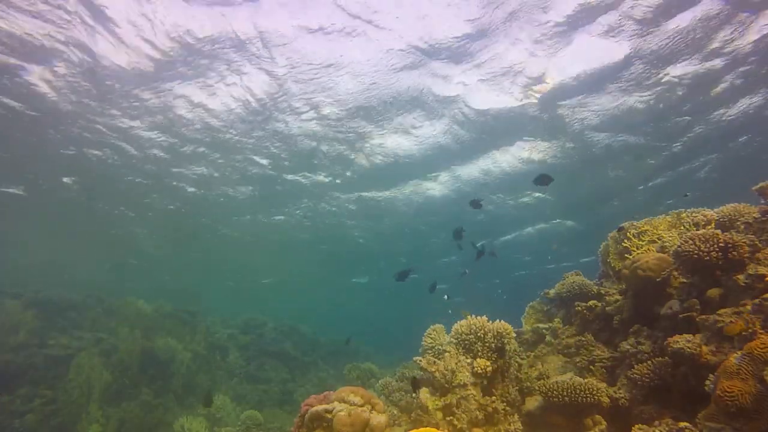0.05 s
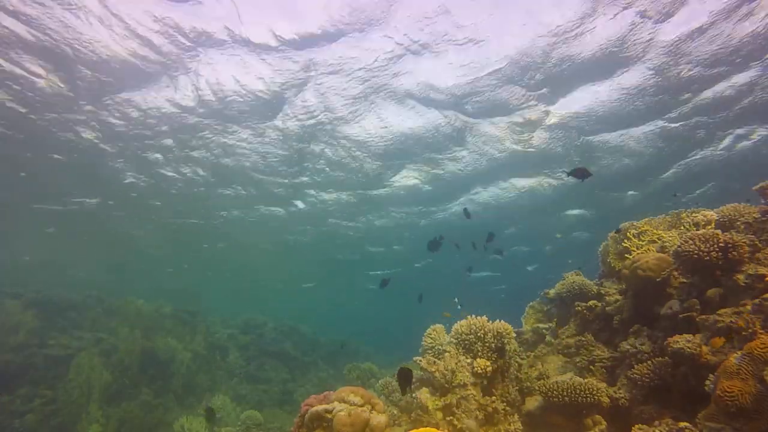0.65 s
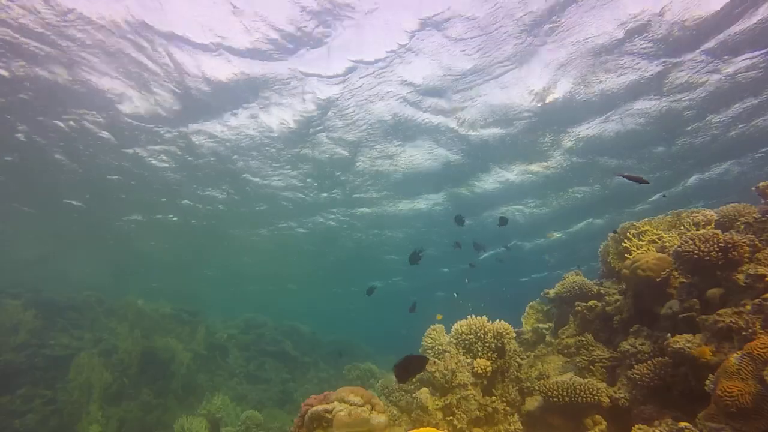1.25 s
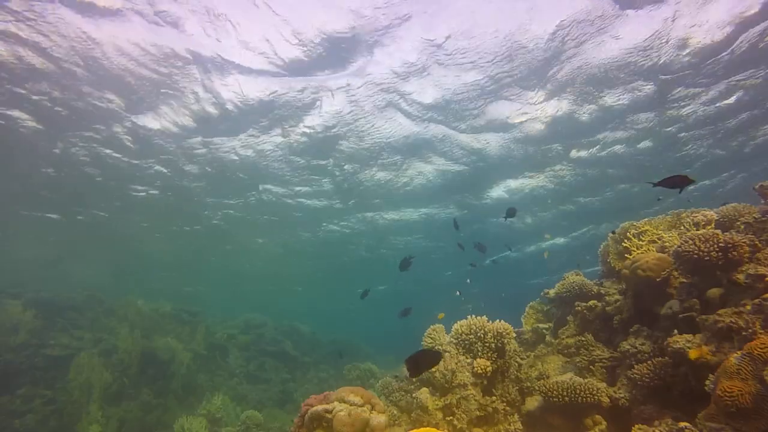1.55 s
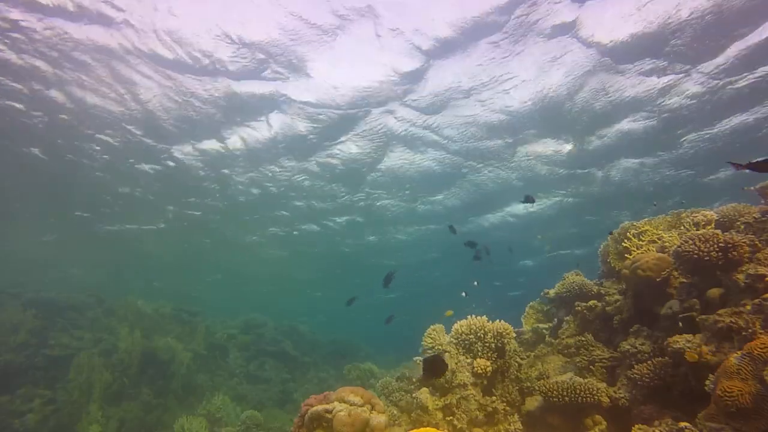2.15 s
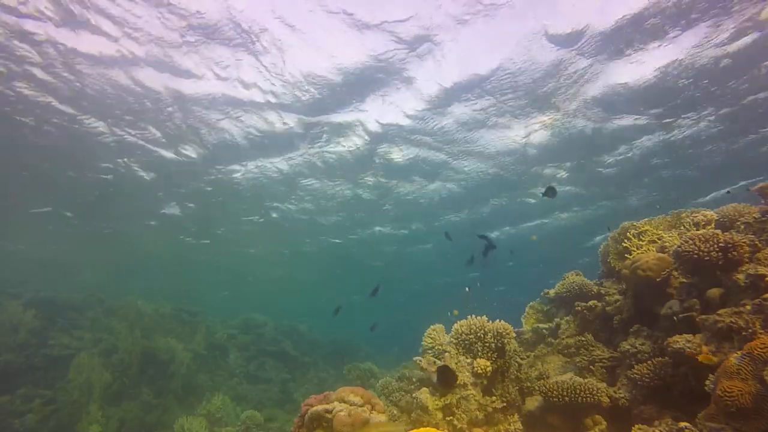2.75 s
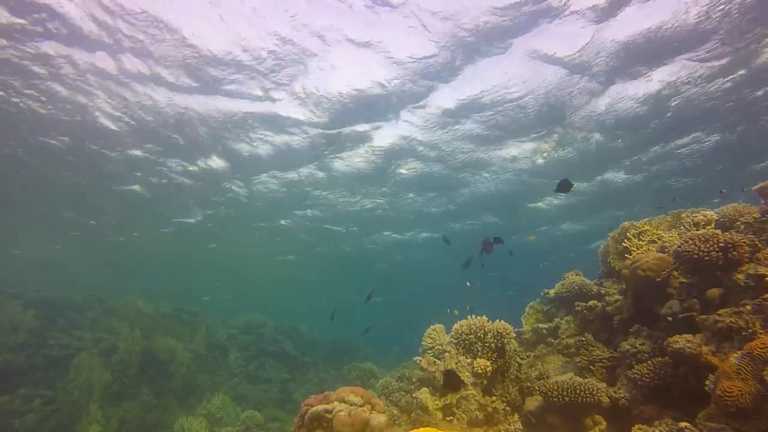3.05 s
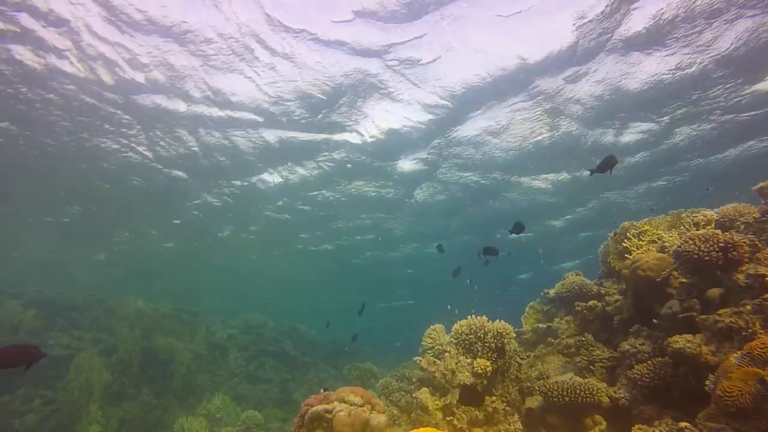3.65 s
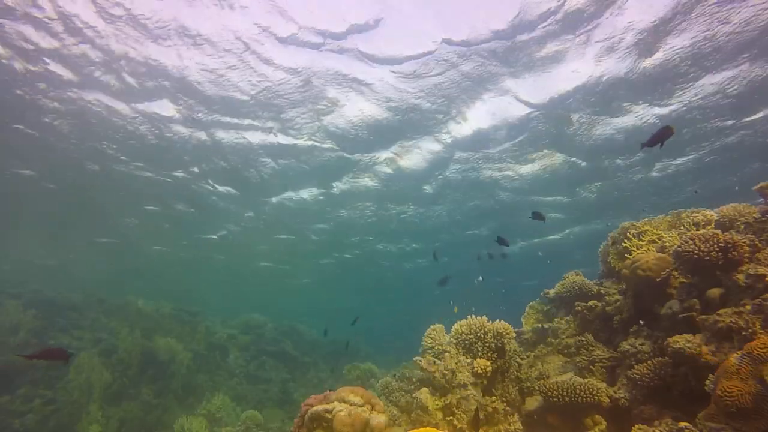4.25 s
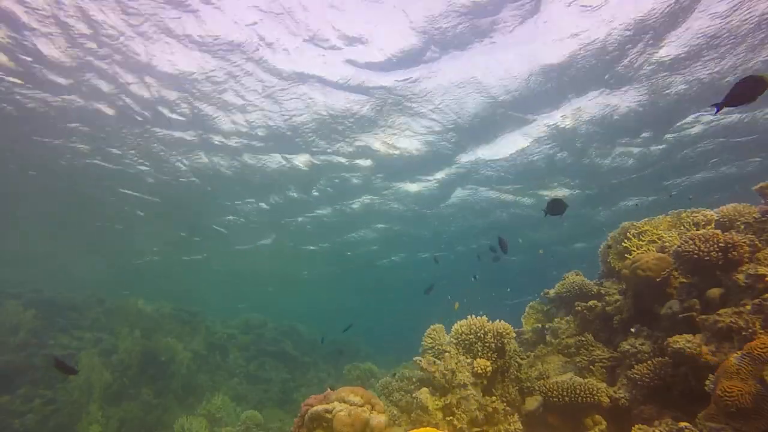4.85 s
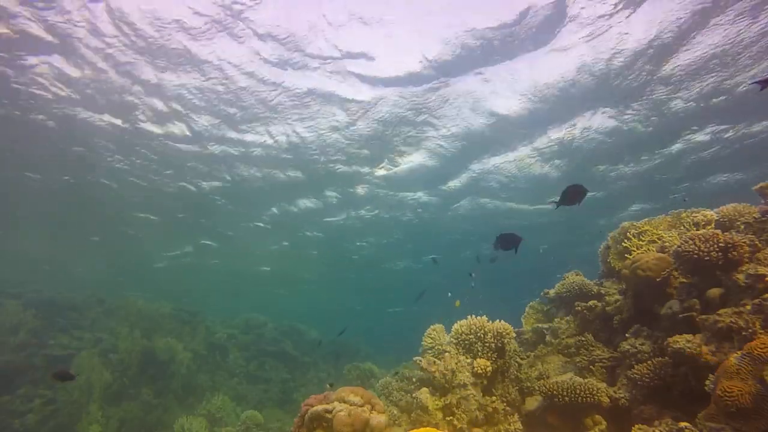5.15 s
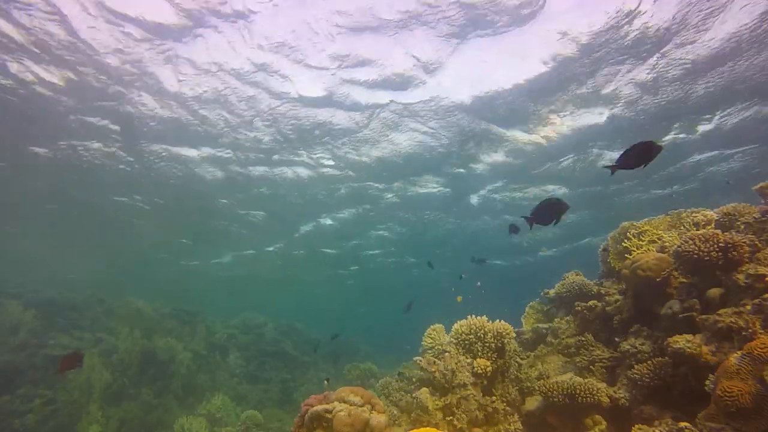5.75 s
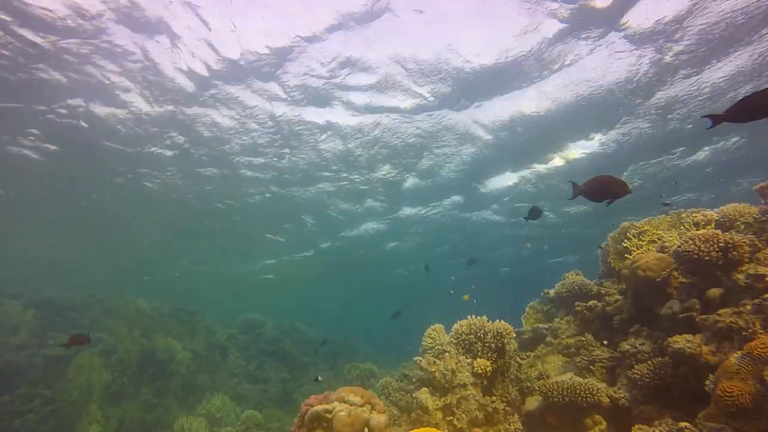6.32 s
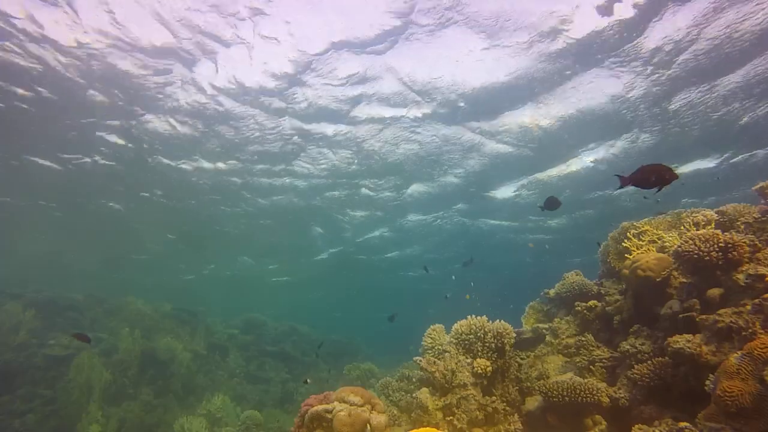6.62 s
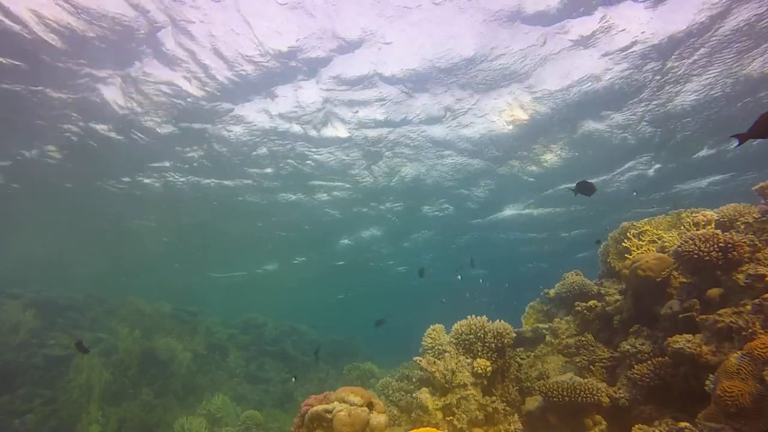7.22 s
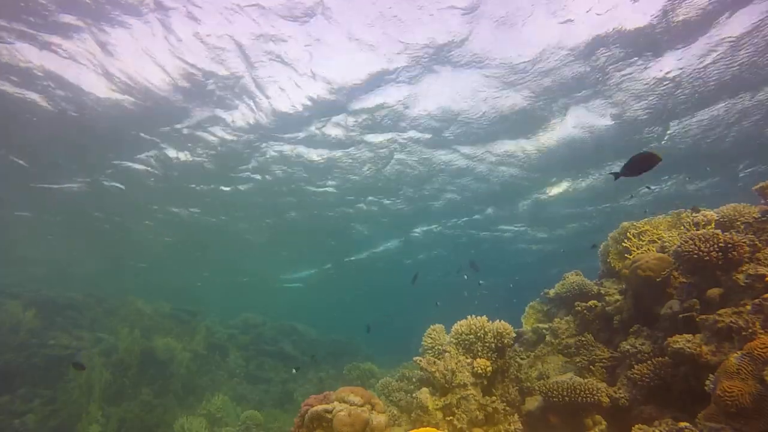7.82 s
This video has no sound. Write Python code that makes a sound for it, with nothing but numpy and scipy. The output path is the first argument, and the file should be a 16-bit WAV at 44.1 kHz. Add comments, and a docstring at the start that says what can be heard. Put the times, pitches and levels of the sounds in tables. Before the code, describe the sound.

Muffled underwater sloshing and glugging bubbles, with scattered sharp shrimp clicks, a fine crackle and a low rumble of moving water.

```python
"""Snapping shrimp click close by and crackle all over a shallow coral reef.
Each snap is a claw shutting and a bubble collapsing, which rings the waterproof housing of a camera.
Overhead, choppy waves slosh and shed bubbles that gurgle, glug and ping.
Underneath it all are the dull rumble of moving water and the hum of a distant boat."""
import sys
import numpy as np
from scipy import signal
from scipy.fft import rfft, irfft
from scipy.io import wavfile

SR = 44100
rng = np.random.default_rng(int(sys.argv[2]) if len(sys.argv) > 2 else 0)


def wrap_up_sound(samples):
    """Save the sound to the file named by the first command line argument, as 16-bit audio."""
    columns = np.atleast_2d(samples).T
    # keep every value between -1 and 1, then stretch to whole-number steps
    tamed = np.clip(columns, -1, 1)
    steps = np.round(tamed * 32767).astype(np.int16)
    wavfile.write(sys.argv[1], SR, steps)


N = 351918
TIME = np.arange(N) / SR


# The loudest snaps. Tilt brightens or dulls a snap. At the notch pitch, its nearest echo is half
# a cycle late. A negative echo strength means the echo comes back upside down.
# (time [s], relative level [dB], favoured pitch [Hz], tilt [dB/octave], notch [Hz], echo [-1 to 1])
NEAR_SNAPS = [(0.051, -50.5, 5050, 3.5, 7800, 0.8), (0.123, -59.5, 2570, -0.5, 8100, 1),
              (0.2571, -59, 6150, 5, 14700, 1), (0.4178, -53.5, 2400, -9, 4000, 0.19),
              (0.497, -59, 6500, -9, 4260, 0.52), (0.538, -66, 6500, 4, 12000, 0.71),
              (0.6455, -56, 6530, 1.5, 8200, 0.81), (0.8126, -57.5, 6140, 0, 4700, 0.31),
              (0.8838, -57, 4330, -7, 10500, 0.9), (1.2398, -51.5, 5200, 5.5, 11000, 0.24),
              (1.244, -46.5, 3400, -4, 11000, 0.22), (1.2665, -57, 4190, -2, 10000, 0.36),
              (1.522, -56.5, 6600, -7, 4300, 0.081), (1.656, -63, 9000, 1, 4500, 0.0067),
              (1.7, -51.0, 9200, -2, 5350, 0.58), (1.891, -58, 7000, -2, 14000, 0.3),
              (2.0027, -28, 3260, 3.2, 9000, 0.93), (2.206, -64, 6100, 0, 10000, 0.4),
              (2.272, -62, 4700, -1, 13000, 0.6), (2.4335, -58, 4000, 4, 15000, 0.4),
              (2.487, -54.5, 7640, 0, 11600, 0.9), (2.521, -60, 6600, 1, 11000, 1),
              (2.728, -58, 10020, 8, 13400, 0.9), (2.743, -62, 4700, -3, 8000, 0.19),
              (2.9564, -52.5, 3150, 1, 13000, 0.43), (2.9757, -54.5, 2050, -7, 4300, 0.6),
              (2.992, -56.5, 6500, -4, 9500, 0.3), (3.079, -49, 2900, -1.5, 13800, 0.044),
              (3.081, -55, 7500, -6, 12000, 0.28), (3.142, -53, 4310, 7, 12400, 0.4),
              (3.1456, -45, 2560, 0, 12100, 0.93), (3.1871, -58, 9470, -3, 4000, 0.9),
              (3.334, -50.5, 5010, -3.5, 5600, -0.19), (3.366, -54, 3990, -5, 4600, 0.23),
              (3.6, -56.0, 7740, 5, 11500, 0.99), (3.455, -58, 6600, -6, 4400, 0.045),
              (3.709, -60, 7400, 6, 14000, 0.64), (3.7938, -52.5, 5240, -2.5, 7300, 0.39),
              (3.838, -60, 6600, 3, 10000, 0.3), (3.8515, -41.5, 2470, -0.5, 4300, -0.043),
              (3.912, -53.5, 3190, -4.5, 15800, 0.13), (3.996, -61.5, 7850, 4, 15000, 0.55),
              (4.133, -55.5, 2670, -6, 8200, 0.9), (4.193, -55, 6030, -2.5, 4750, 0.61),
              (4.2527, -58, 10450, 3.5, 14100, 0.9), (4.286, -56.5, 6500, -9, 4400, 0.21),
              (4.578, -62, 4900, 8, 14000, 0.45), (4.7517, -51.5, 2400, -6.5, 7400, 0.4),
              (5.2157, -53, 3530, 2.5, 11500, 0.61), (5.2703, -43.5, 7360, 4, 11000, 0.95),
              (5.2832, -49.5, 6700, 1, 15800, 0.7), (5.3744, -54, 2720, -8, 6500, 0.9),
              (5.442, -52.5, 8540, -5, 8300, 0.46), (5.497, -57, 4800, -3, 12000, 0.7),
              (5.505, -56.5, 6800, 7, 14000, 0.7), (5.6105, -47.5, 2950, -11, 10800, 0.9),
              (5.657, -53, 4760, 3, 15800, 0.043), (5.763, -54, 3360, 1, 13800, 0.8),
              (5.834, -59, 7000, -3, 4400, -0.013), (5.856, -59, 7400, 7, 15000, 0.22),
              (5.984, -56.5, 5000, 2, 10300, 0.7), (6.1395, -52.5, 3620, -1, 13200, 0.4),
              (6.1678, -46.5, 4400, -4, 5800, 0.52), (6.221, -52.5, 5240, -5, 9000, 0.9),
              (6.261, -59, 8000, -6, 4500, 0.067), (6.411, -54.5, 4730, -9.5, 5600, 0.57),
              (6.45, -57, 5900, -1, 11000, 0.16), (6.4918, -60, 7710, 7, 14300, 0.7),
              (6.503, -59, 6600, -4, 4400, 0.6), (6.5373, -44, 2600, -4, 11200, 0.9),
              (6.541, -47, 2020, 1.5, 9100, 0.64), (6.7257, -58, 8900, 1.5, 4400, 0.043),
              (6.7788, -54, 2650, -1.5, 9600, 0.64), (6.795, -50, 2500, -3, 9000, 0.3),
              (6.7994, -42.5, 2330, -7, 4180, 0.36), (6.8416, -54.5, 4820, 1, 4300, 0.18),
              (7.027, -54, 7110, -3, 14000, 0.98), (7.1058, -52, 2910, -8, 4000, 0.045),
              (7.1196, -40.5, 2730, -4, 12000, 0.45), (7.1669, -54, 2800, -2, 10500, 0.5),
              (7.177, -57, 2990, 0, 4300, 0.5), (7.35, -55.0, 6380, 2, 15500, 0.9),
              (7.394, -59, 7000, -7, 4400, 0.6), (7.597, -58, 5500, 0, 14000, 0.49),
              (7.6308, -33, 3280, -0.5, 2980, -0.79)]

def near_shrimp(gain_db):
    """Shrimp on the coral beside the camera snap one by one."""
    out = np.zeros(N)
    for time, db, pitch_hz, tilt_db, notch_hz, echo in NEAR_SNAPS:
        claw_db = -10 - 4.9 * max(db + 36, 0)  # in the loudest snaps, the pop swamps the claw
        lead_s, sound = snap(db, pitch_hz, tilt_db, notch_hz, echo, claw_db)
        add(out, time - lead_s, sound)
    return out * undb(gain_db)


def snap(db, pitch_hz, tilt_db, notch_hz, echo, claw_db):
    """A claw clicks shut, then the bubble it made collapses. Returns the gap [s] and the sound."""
    gap = int(SR * (0.0014 + 0.0014 * rng.random()))
    ring = housing_ring(tilt_db, notch_hz, echo)
    # The size of the bubble favours one pitch.
    ring = ring + signal.lfilter(*signal.iirpeak(pitch_hz, Q=3.5, fs=SR), ring)
    # Close echoes off the coral thicken the crack.
    ring = signal.fftconvolve(ring, echoes(tail_db=-31.5 - 0.5 * db, fade_s=0.0088))
    # Fainter shrimp sit further off, so more of their sound comes as echoes.
    tail_db = -27 - 0.34 * db
    claw = signal.fftconvolve(coral_smear(ring), echoes(tail_db, fade_s=0.057))
    pop = signal.fftconvolve(coral_smear(ring), echoes(tail_db, fade_s=0.057))
    sound = np.pad(pop, (gap, 0)) + undb(claw_db) * np.pad(claw, (0, gap))
    pop_strength = np.sqrt(np.mean(pop[:220] ** 2))  # over its first 5 ms
    return gap / SR, sound * undb(db) / pop_strength


# The pitches at which the camera's housing rings: (pitch [Hz], width [Hz], relative level [dB])
HOUSING_RESONANCES = [(855, 490, -8.5), (1635, 120, -6.5), (2125, 160, -2.5), (2470, 600, -2),
                      (3048, 265, 1.5), (3733, 610, -2), (4757, 830, -1.5), (5914, 520, 0.5),
                      (6990, 1300, -1.5), (7880, 620, -4), (9230, 2350, -5.5), (10480, 1600, -7.5),
                      (12300, 1100, -9), (14000, 980, -14)]

def housing_ring(tilt_db, notch_hz, echo, size=1024):
    """The housing rings after one sharp push from the water and its echo off the rock."""
    hz = np.fft.rfftfreq(size, 1 / SR)
    power = sum(undb(db) ** 2 / (1 + (2 * (hz - pitch) / width) ** 2) ** 2
                for pitch, width, db in HOUSING_RESONANCES)
    octaves_up = np.log2(np.maximum(hz / HOUSING_RESONANCES[1][0], 1))
    spectrum = np.sqrt(power) * undb(tilt_db * octaves_up)
    # This folding step makes the ring come after the push, never before it.
    cepstrum = irfft(np.log(spectrum))
    cepstrum[1:size // 2] *= 2
    cepstrum[size // 2 + 1:] = 0
    rock_echo = echo * np.exp(-1j * np.pi * hz / notch_hz)
    return irfft(np.exp(rfft(cepstrum)) * (1 + rock_echo))


def echoes(tail_db, fade_s, size=1024):
    """A click, then a blur of echoes off coral and surface that falls 60 dB in fade_s."""
    tail = rng.standard_normal(size) * undb(-60 * np.arange(size) / SR / fade_s)
    return signal.unit_impulse(size) + undb(tail_db) * tail / np.linalg.norm(tail)


def coral_smear(sound, width_hz=1050, count=6):
    """Rough coral holds the higher pitches back, so a click gets longer but keeps its tone."""
    for hz in np.geomspace(4000, 13000, count) * rng.uniform(0.88, 1.12, count):
        _, poles = signal.iirpeak(hz, hz / width_hz, fs=SR)
        sound = signal.lfilter(poles[::-1], poles, sound)  # only delays, never weakens
    return sound


def shrimp_colony(db, spread_db, tilt_db, low_hz, high_hz, count):
    """Shrimp a few metres off make faint ticks, each loosely pitched by the size of its bubble."""
    ticks = np.zeros(N)
    for when, distance, pitch, length in rng.random((count, 4)):
        tick = bubble(low_hz * (high_hz / low_hz) ** pitch, cycles=3 + 5 * length, glide=0)
        tick = signal.fftconvolve(tick, echoes(tail_db=-3.5, fade_s=0.0082))
        gain = undb(-spread_db * np.log(distance + 0.18))
        add(ticks, when * N / SR, gain * tick / np.linalg.norm(tick))
    ring = housing_ring(tilt_db, notch_hz=11800, echo=0.34)
    return set_level(signal.fftconvolve(ticks, ring)[:N], db)


# The tone of the far-off shrimp: (pitch [Hz], relative level [dB])
SIZZLE_SPECTRUM = [(500, -13), (1100, -2), (1650, -1), (1800, 0.5), (2250, 2.2), (2800, -3.5), (3050, -0.5),
                   (3400, -1.5), (5300, -8), (5950, -8.5), (6400, -9), (7300, -9), (11000, -15.5),
                   (14500, -18.5), (15500, -49)]

def far_shrimp(db, spread_db, count=9000, fade_s=0.015):
    """Thousands of distant snaps, each smeared by its own echoes, blur into a soft sizzle."""
    power = np.zeros(N)
    starts = rng.integers(0, N, count)
    np.add.at(power, starts, undb(spread_db * rng.standard_normal(count)) ** 2)
    power = signal.lfilter([1], [1, -np.exp(-1 / (fade_s * SR))], power)  # each snap fades away
    sizzle = np.sqrt(power) * rng.standard_normal(N)
    return set_level(shape_tone(sizzle, SIZZLE_SPECTRUM), db)


# Waves passing overhead:
# (crest time [s], relative level [dB], length [s], froth level compared with the wave [dB])
WAVE_CRESTS = [(0.135, -57.5, 0.052, -1), (0.323, -62.5, 0.19, 3), (1.04, -54.5, 0.14, -1),
               (1.967, -62, 0.66, -1), (2.82, -54.5, 0.09, 2.5), (3.083, -54, 0.17, 2.5),
               (3.536, -55, 0.35, 0), (4.247, -57, 0.1, -12), (4.637, -57, 0.33, -2),
               (5.51, -56, 0.21, 3.5), (5.854, -53.5, 0.11, 0), (6.063, -53.5, 0.049, -11),
               (7.174, -52.5, 0.18, -3), (7.59, -52.5, 0.14, 0.5)]

def wave_level(frothy=False, lapping_db=-60, rise_share=0.8):
    """Loudness [dB] of the waves or their froth: each builds and dies away over steady lapping."""
    power = undb(lapping_db) ** 2
    for time, db, length, froth_db in WAVE_CRESTS:
        age = (TIME - time) / length
        from_crest = np.where(age < 0, age / rise_share, age)
        power = power + undb(db + frothy * froth_db) ** 2 * np.exp(-2 * from_crest ** 2)
    return 10 * np.log10(power)


# The tone of the sloshing: (pitch [Hz], relative level [dB])
SLOSH_SPECTRUM = [(100, -25), (250, -5.5), (380, -2), (510, 1), (670, -0.5), (820, 4.5), (950, -1),
                  (1100, -5.5), (2000, -51)]

def sloshing_waves(gain_db, spread_db, low_hz, high_hz, count):
    """A cloud of gurgling bubbles swells with each wave."""
    cloud = np.zeros(N)
    for when, pitch, length, faintness in rng.random((count, 4)):
        ring = bubble(low_hz + (high_hz - low_hz) * pitch, cycles=6 + 12 * length, glide=0.25)
        add(cloud, when * N / SR, ring * undb(-spread_db * np.log(faintness + 0.015)))
    return set_level(shape_tone(cloud, SLOSH_SPECTRUM), gain_db) * undb(wave_level())


def fizz(waves_db, db, follow, spread_db, low_hz, high_hz, count):
    """Bubbles of similar size ring just after each wave, louder after a bigger wave."""
    cloud = np.zeros(N)
    for when, pitch, length, faintness in rng.random((count, 4)):
        ring = bubble(low_hz + (high_hz - low_hz) * pitch, cycles=15 + 25 * length, glide=0.059)
        add(cloud, when * N / SR, ring * undb(-spread_db * np.log(faintness + 0.0097)))
    delayed_db = np.interp(TIME - 0.02, TIME, waves_db)
    return set_level(cloud * undb(follow * delayed_db), db)


# The bubbles that stand out from the rest: (time [s], relative level [dB], pitch [Hz])
LOUD_BUBBLES = [(0.123, -55, 530), (0.149, -52, 280), (0.151, -46, 537), (1.030, -43.5, 804),
                (1.031, -37, 377), (1.035, -40, 252), (1.099, -38, 563), (2.239, -42.5, 780),
                (2.240, -41, 560), (2.24, -40, 323), (2.433, -42.5, 3100), (2.772, -29.5, 487),
                (3.133, -48.5, 846), (3.153, -42, 2330), (3.419, -41.5, 470), (3.472, -41.5, 680),
                (3.703, -38, 510), (3.706, -40.5, 211), (3.94, -40.5, 323), (4.525, -45, 385),
                (4.555, -44, 237), (4.627, -38, 330), (4.630, -43, 777), (4.951, -42.5, 790),
                (4.984, -52, 700), (5.013, -41, 2630), (5.013, -45.5, 2240), (5.104, -37, 330),
                (5.108, -35.5, 190), (5.138, -32, 592), (5.286, -39, 350), (5.329, -48.5, 867),
                (5.416, -45, 630), (5.491, -42.5, 798), (5.493, -39, 496), (5.556, -33.5, 237),
                (5.653, -49.5, 830), (5.778, -39, 636), (5.795, -40.5, 278), (5.873, -44, 340),
                (5.874, -41, 560), (5.875, -45, 787), (6.108, -39, 262), (6.109, -43, 730),
                (6.110, -38, 450), (7.132, -41, 2600), (7.201, -52, 793), (7.203, -43, 560),
                (7.334, -41.5, 323), (7.435, -33.5, 588), (7.503, -51, 851)]

def single_bubbles(gain_db):
    """Big air pockets glug and small ones ping; they close softly, so each stays near its pitch."""
    out = np.zeros(N)
    for time, db, hz in LOUD_BUBBLES:
        cycles = 14.3 * (hz / 516) ** 0.82  # smaller, higher bubbles ring for more cycles
        cycles += 150 * np.exp(-((hz - 834.5) / 37) ** 2)  # gurgles in this narrow range ring longer
        soften = signal.butter(2, [0.33 * hz, 1.56 * hz], "bandpass", fs=SR, output="sos")
        add(out, time, undb(db) * signal.sosfilt(soften, bubble(hz, cycles, glide=-0.1)))
    return out * undb(gain_db)


def bubble(hz, cycles, glide):
    """A pocket of air rings and fades by 60 dB; glide bends its pitch up (+) or down (-)."""
    age = np.arange(int(cycles / hz * SR)) * hz / (cycles * SR)  # runs from 0 to 1
    return np.sin(2 * np.pi * cycles * (age + glide * age ** 2 / 2)) * undb(-60 * age)


# The tone of the moving water: (pitch [Hz], relative level [dB])
RUMBLE_SPECTRUM = [(8, -17), (25, -8), (65, -7), (100, -2), (150, -0.5), (210, -2), (300, -7.5), (420, -16),
                   (800, -19), (1100, -21), (1600, -23.5), (3000, -55.5)]

def water_rumble(db, sway_db):
    """Moving water rumbles, swaying at random and swelling slightly with the waves."""
    waves_db = wave_level()
    swell_db = 0.05 * (waves_db - waves_db.mean()) + sway_db * wander(rate_hz=5.1)
    rumble = shape_tone(rng.standard_normal(N), RUMBLE_SPECTRUM)
    return set_level(rumble, db) * undb(swell_db)


# The notes in the boat's hum: (pitch [Hz], relative level [dB])
ENGINE_TONES = [(75.3, -85), (112.8, -65.5), (122.5, -62), (150.3, -61), (163, -69)]

def distant_boat(gain_db, drift):
    """An engine hums with steady tones that drift slightly in pitch."""
    hum = np.zeros(N)
    for hz, db in ENGINE_TONES:
        pitch_hz = hz * (1 + drift * wander(rate_hz=4))
        hum += undb(db) * np.sin(2 * np.pi * np.cumsum(pitch_hz) / SR)
    return undb(gain_db) * np.sqrt(2) * hum


def undb(db):
    """Turn decibels into a number to multiply by."""
    return 10 ** (np.asarray(db) / 20)


def set_level(sound, db):
    """Scale a sound to an average (rms) level."""
    return sound * undb(db) / np.sqrt(np.mean(sound ** 2))


def add(out, time, sound):
    """Mix a sound in at a time [s]."""
    start = int(np.clip(time * SR, 0, N - 1))
    out[start:start + len(sound)] += sound[:N - start]


def wander(rate_hz):
    """A smooth random curve that typically strays about 1 from zero."""
    hz = np.fft.rfftfreq(N, 1 / SR)
    slow_only = np.exp(-(hz / rate_hz) ** 2) * (hz > 0)
    return set_level(irfft(rfft(rng.standard_normal(N)) * slow_only, N), db=0)


def shape_tone(sound, spectrum):
    """Turn pitches up or down along a curve of (pitch [Hz], level [dB]) points."""
    hz, db = np.transpose(spectrum)
    all_hz = np.maximum(np.fft.rfftfreq(N, 1 / SR), 1)
    curve_db = np.interp(np.log(all_hz), np.log(hz), db)
    return irfft(rfft(sound) * undb(curve_db), N)


def scene():
    """Water, waves and shrimp add up at one microphone."""
    background = water_rumble(db=-52, sway_db=1) + distant_boat(gain_db=1.5, drift=0.0029)
    slosh = sloshing_waves(gain_db=0.5, spread_db=5, low_hz=217.5, high_hz=943, count=8000)
    glugs = single_bubbles(gain_db=3)
    gurgle = fizz(wave_level(), db=-70.5, follow=3.3, spread_db=6, low_hz=738, high_hz=924, count=500)
    froth = fizz(wave_level(frothy=True), db=-66.5, follow=1.08, spread_db=3,
                 low_hz=1947, high_hz=3240, count=4000)
    snaps = near_shrimp(gain_db=3)
    crackle = shrimp_colony(db=-70.5, spread_db=6, tilt_db=-2, low_hz=2570, high_hz=10800, count=520)
    sizzle = far_shrimp(db=-63, spread_db=3)
    ticks = shrimp_colony(db=-74.5, spread_db=7, tilt_db=4.5, low_hz=5800, high_hz=14400, count=330)
    return (snaps + crackle + ticks + sizzle + slosh + gurgle + froth + glugs + background)[None]


def record(dry):
    """The camera cuts off the highest treble."""
    top_hz = 15800
    return signal.sosfilt(signal.ellip(8, 0.2, 70, top_hz, fs=SR, output="sos"), dry)


dry = scene()
out = record(dry)
wrap_up_sound(out)
```